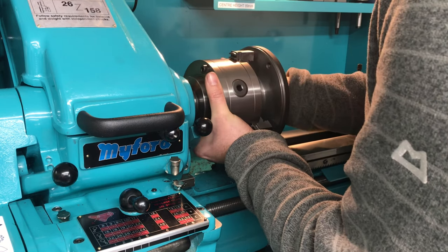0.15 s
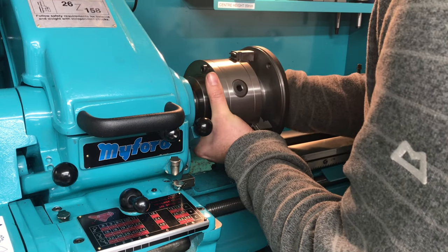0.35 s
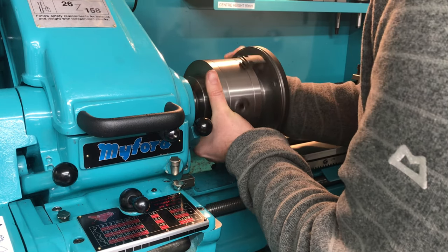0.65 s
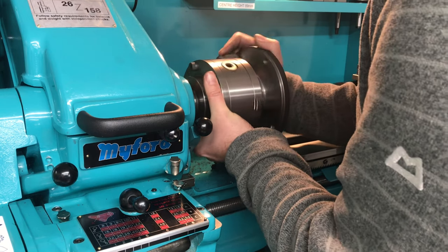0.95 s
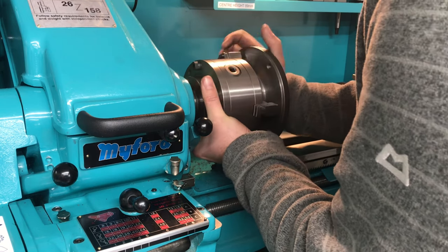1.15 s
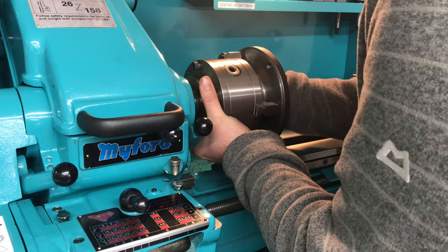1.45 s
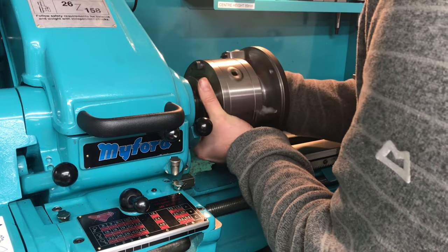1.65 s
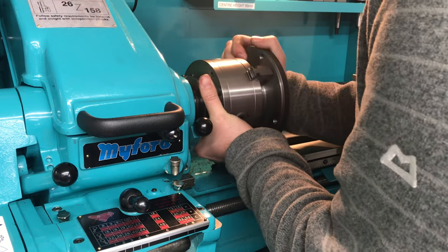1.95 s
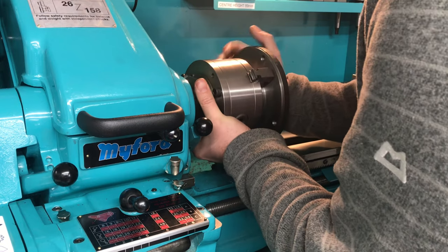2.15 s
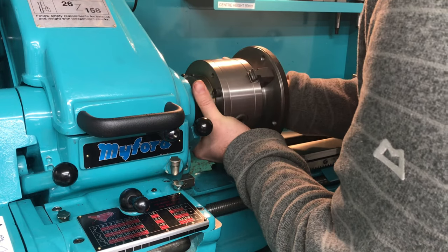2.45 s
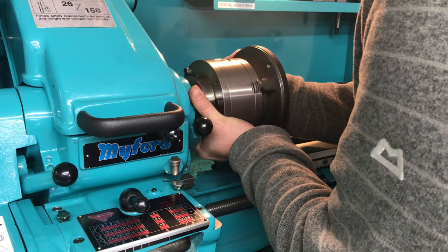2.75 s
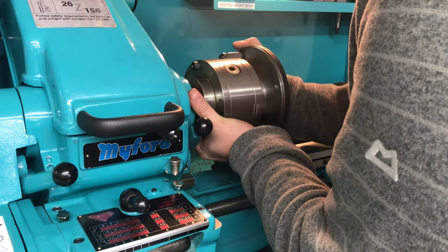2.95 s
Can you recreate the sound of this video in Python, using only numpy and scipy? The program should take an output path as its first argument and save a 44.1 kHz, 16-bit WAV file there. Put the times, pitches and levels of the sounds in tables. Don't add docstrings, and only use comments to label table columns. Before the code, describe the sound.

Close up in a small room, a metal chuck rubs on its thread, knocking the lathe casting and thumping its stand; the strongest clank comes two thirds through, then lighter knocks over faint hiss.

```python
import sys
import numpy as np
from scipy import signal
from scipy.fft import rfft, irfft
from scipy.io import wavfile
from scipy.ndimage import uniform_filter1d

SR = 44100
rng = np.random.default_rng(int(sys.argv[2]) if len(sys.argv) > 2 else 0)


def volts_from_decibels(level):
    exponent = np.asarray(level, float) / 20
    return 10 ** exponent


def digitize_waveform(pressure):
    field = np.atleast_2d(pressure).T
    bounded = np.clip(field, -1, 1)
    quanta = np.round(bounded * 32767).astype(np.int16)
    wavfile.write(sys.argv[1], SR, quanta)


N = 136710
SCATTER_DB = 3.5


def unit(x, size=None):
    return x / np.sqrt(np.mean(x[:size] ** 2))


def band(x, hz, width):
    low = np.sqrt(hz ** 2 + width ** 2 / 4) - width / 2
    high = min(low + width, 0.45 * SR)
    return signal.sosfilt(signal.butter(2, [low, high], "band", fs=SR, output="sos"), x)


def walk(rate):
    hold = int(SR / rate)
    steps = np.repeat(rng.standard_normal(N // hold + 1), hold)
    return 1.3 * uniform_filter1d(uniform_filter1d(steps, hold), hold)[:N]


def add(out, start_s, x):
    i = int(start_s * SR)
    out[i:i + len(x)] += x[:max(N - i, 0)]


def ring(modes, seconds):
    t = np.arange(int(seconds * SR))[:, None] / SR
    hz, db, t60 = np.array(modes).T
    return volts_from_decibels(db) * np.sin(2 * np.pi * hz * t) * np.exp(-np.log(1000) * t / t60)


def strike(sines, scatter_db):
    sign, strength = rng.standard_normal((2, sines.shape[1]))
    return sines @ (np.sign(sign) * volts_from_decibels(scatter_db * strength))


def blow(push, sines, db, scatter_db):
    return volts_from_decibels(db) * unit(signal.fftconvolve(push, strike(sines, scatter_db)), size=1800)


def dense(outline, count):
    outline_hz, outline_db, outline_t60 = np.array(outline).T
    place, damping = rng.random((2, count))
    hz = outline_hz[0] * (outline_hz[-1] / outline_hz[0]) ** ((np.arange(count) + place) / count)
    share = 0.25 ** damping
    db = np.interp(hz, outline_hz, outline_db) - 10 * np.log10(share)
    return list(zip(hz, db, share * np.interp(hz, outline_hz, outline_t60)))


# [f/Hz, level/dB, t60/s]
STAND_MODES = [(58, 2.5, 1), (66.5, -3, 0.6), (72, -3.5, 0.5), (77.9, 0.5, 0.4), (85, 0.5, 0.3),
               (95.9, 3.5, 0.53), (107.5, 4, 0.35), (117.3, 6, 0.36)]
# [f/Hz, level/dB, t60/s]
CABINET_MODES = [(140.7, -4, 0.37), (174.8, 0.5, 0.32), (185.6, -3, 0.755), (216.8, -2, 0.36),
                 (264, 7.5, 0.31), (292.8, -5.5, 0.77), (316.7, -9.5, 0.38), (380.3, -4, 0.4),
                 (414.6, -3, 0.63), (468.5, -18, 0.7)]
# [f/Hz, level/dB, t60/s]
PANEL_OUTLINE = [(130.85, -13.5, 0.35), (204, -3.5, 0.54), (304, 3.5, 0.55), (411, 1.5, 0.21),
                 (522.9, -4, 0.3)]
# [f/Hz, level/dB, t60/s]
CASTING_OUTLINE = [(454.9, -22, 1), (554, -3.5, 0.48), (774, 4, 0.33), (940, -1.5, 0.26), (1200, 5, 0.2),
                   (1700, -2.5, 0.087), (2300, -4, .1)]


def bodies():
    casting = dense(CASTING_OUTLINE, count=260)
    panels = [(hz, db - 2.5, t60) for hz, db, t60 in dense(PANEL_OUTLINE, count=40)]
    return STAND_MODES, casting, CABINET_MODES + panels, panels


# [f/Hz, level/dB per Hz]
HUSH_COLOUR = [(30, 11.5), (80, -2.5), (300, -8.5), (1200, -19.5), (3000, -24.5), (7500, -29),
               (10000, -29.5), (15600, -27)]


def hush():
    hz = np.fft.rfftfreq(N, 1 / SR) + 1
    colour_hz, colour_db = np.array(HUSH_COLOUR).T
    colour = volts_from_decibels(np.interp(np.log(hz), np.log(colour_hz), colour_db, left=-60))
    return volts_from_decibels(-62.5) * unit(irfft(rfft(rng.standard_normal(N)) * colour, N))


# [f/Hz, width/Hz, level/dB]
WHINE_BANDS = [(12480, 2100, -3.5), (13200, 1000, -4.5), (10600, 2200, -6)]


def circuit_hiss():
    frame_hz, first_frame_s = 30, 0.0313
    burst_s, busy_s = 0.0034, 0.0187
    frames = first_frame_s + np.arange(-1, N / SR * frame_hz) / frame_hz
    hiss, gate = np.zeros(N), np.zeros(N)
    for hz, width, db in WHINE_BANDS:
        hiss += volts_from_decibels(db) * unit(band(rng.standard_normal(N), hz, width)) * volts_from_decibels(2.1 * walk(60))
    delay, longer, size = rng.random((3, len(frames), 3))
    starts = frames[:, None] + np.array([0, busy_s, 1 / frame_hz]) * delay
    size = size * [1, 1, 0.7]
    for start_s, extra, strength in zip(starts.ravel(), longer.ravel(), size.ravel()):
        burst = np.abs(np.hanning(int((1 + extra) * burst_s * SR))) ** 0.5
        add(gate, max(start_s, 0), strength ** 0.29 * burst)
    return hiss * volts_from_decibels(-71) * (np.minimum(gate, 1) + 0.24)


# [t/s, level/dB]
TICK_TIMES = [
    (0.0323, -53),
    (0.6652, -52),
    (1.3094, -48),
    (1.5045, -62),
    (2.589, -49),
]


def circuit_ticks():
    out = np.zeros(N)
    for start_s, db in TICK_TIMES:
        pulse = np.eye(1, 200)[0]
        add(out, start_s, volts_from_decibels(db - 12) * unit(band(pulse, 8300, 4500), size=40))
    return out


# [t/s, level/dB]
TURNING_EFFORT = [(0.0, -61), (0.52, -58.5), (0.78, -50.5), (0.9, -53.5), (1.1, -62), (1.39, -59.5),
                  (1.56, -52.5), (1.92, -45), (2.05, -43.5), (2.24, -51), (2.43, -60), (2.68, -53),
                  (2.87, -51.5), (3.1, -50)]


def thread(stand, casting, panels):
    times, db = np.array(TURNING_EFFORT).T
    effort = volts_from_decibels(np.interp(np.arange(N) / SR, times, db))
    scrape = volts_from_decibels(-28 + 2 * walk(16)) * unit(band(rng.standard_normal(N), 4180, 9600))
    out = scrape * (effort / effort.max()) ** -0.28
    for modes, db in (stand, -6.5), (panels, -12.5), (casting, -18.5):
        rub = rng.standard_normal(N) * volts_from_decibels(4 * walk(24.64))
        held = [(hz, level, 0.5 * t60) for hz, level, t60 in modes]
        out += volts_from_decibels(db) * unit(signal.fftconvolve(rub, strike(ring(held, 0.32), 0))[:N])
    return out * effort


# [t/s, stand level/dB, cabinet level/dB, favoured f/Hz]
WEIGHT_SHIFTS = [(0.095, -55.5, -59.5, 59.6), (0.573, -54.5, -53, 76), (0.688, -43, -63, 87),
                 (0.759, -43, -53, 79.6), (0.886, -53, -59, 90), (0.99, -46.5, -55.5, 71),
                 (1.059, -47, -60.5, 79.3), (1.14, -49, -60.5, 63), (1.34, -51, -62.5, 69),
                 (1.494, -35, -53, 81), (1.544, -38.5, -69, 81), (1.592, -40, -76, 86),
                 (1.708, -42, -35, 78.4), (1.745, -39, -54, 62.7), (1.795, -37.5, -56, 91),
                 (1.9, -54, -54, 90), (1.969, -45, -53, 94), (2.035, -26.5, -31, 72),
                 (2.118, -28.5, -48, 83), (2.249, -40, -48.5, 63.8), (2.372, -41.5, -53, 63),
                 (2.449, -48, -53.5, 58), (2.572, -48, -57, 62), (2.68, -46.5, -50.5, 66),
                 (2.849, -45, -57, 63.7), (2.971, -49, -58, 70), (3.073, -47, -68, 75)]


def thumps(stand, cabinet):
    out, push = np.zeros(N), np.hanning(220)
    stand_hz = np.array(stand)[:, 0]
    stand_sines, cabinet_sines = ring(stand, 1.0), ring(cabinet, 0.73)
    for start_s, stand_db, cabinet_db, hz in WEIGHT_SHIFTS:
        favour = volts_from_decibels(-25 * np.abs(np.log2(stand_hz / hz)))
        add(out, start_s, blow(push, stand_sines * favour, stand_db - 8, 0))
        add(out, start_s, blow(push, cabinet_sines, cabinet_db - 8, SCATTER_DB))
    return out


# [t/s, casting level/dB, cabinet level/dB, chatter/s, brightness f/Hz]
THREAD_KNOCKS = [(0.167, -64, -78, .004, 1400), (0.178, -58, -77, 0.011, 1990),
                 (0.456, -59, -61, 0.01, 1500), (0.535, -55, -60, 0.0094, 1700),
                 (0.585, -57.5, -61.5, 0.008, 920), (0.657, -62, -48, 0.019, 700),
                 (0.672, -44.5, -49.5, 0.0057, 1800), (0.681, -44.5, -44, 0.0046, 820),
                 (0.686, -39.5, -42.5, 0.002, 870), (0.696, -41, -44, 0.011, 1700),
                 (0.767, -54, -55, 0.0072, 900), (0.826, -51, -54, 0.012, 690),
                 (0.864, -49, -77, 0.01, 1590), (0.885, -49, -54.5, 0.0019, 800),
                 (0.926, -61, -59, 0.012, 810), (1.018, -61, -56.5, .008, 700),
                 (1.483, -60, -54.5, 0.0041, 1200), (1.633, -59, -58.5, 0.0068, 900),
                 (1.687, -51, -42, 0.0066, 1200), (1.707, -47, -44, 0.02, 600),
                 (1.735, -46, -45, 0.0086, 1610), (1.868, -44.5, -51, 0.0067, 1420),
                 (1.875, -66, -44.5, 0.0079, 700), (1.904, -59, -44, 0.008, 800),
                 (1.957, -52, -48.5, .006, 700), (1.969, -53, -46, 0.0059, 1490),
                 (2.013, -28.5, -38, 0.0056, 1470), (2.029, -29, -30.5, 0.0043, 1080),
                 (2.151, -54, -54.5, 0.0054, 1020), (2.676, -54, -53.5, 0.004, 1290),
                 (2.753, -56, -50.5, 0.0024, 800), (2.842, -43, -48.5, 0.0082, 1260),
                 (2.858, -42, -42.5, 0.0041, 810), (2.925, -60, -53, 0.015, 700),
                 (2.944, -49.5, -59, 0.012, 880), (3.02, -56.5, -54.5, 0.0083, 900),
                 (3.045, -59, -56, 0.0053, 1400)]


def knocks(casting, cabinet):
    out = np.zeros(N)
    casting_sines, cabinet_sines = ring(casting, 0.57), ring(cabinet, 0.73)
    for start_s, casting_db, cabinet_db, chatter_s, top_hz in THREAD_KNOCKS:
        fade = np.exp(-np.arange(2600) / SR / chatter_s)
        grit = rng.standard_normal(len(fade)) ** 3 * fade
        grit[0] += 44
        soft = signal.lfilter(*signal.butter(3, top_hz, fs=SR), grit)
        add(out, start_s, blow(soft, casting_sines, casting_db - 12.5, SCATTER_DB))
        pressure = uniform_filter1d(np.abs(grit), size=30)
        add(out, start_s, blow(pressure, cabinet_sines, cabinet_db - 4, SCATTER_DB))
    return out


# [t/s, level/dB, f/Hz, t60/s]
CLICKS_AND_SCUFFS = [(0.179, -63.5, 1700, 0.079), (0.179, -74, 5087, 0.068), (0.4574, -74, 2010, 0.035),
                     (0.5374, -64.5, 1560, .07), (0.8634, -49, 1880, 0.075), (0.8645, -68, 3280, .05),
                     (0.864, -74.5, 8600, .04), (0.881, -63, 2100, .18), (0.935, -75, 8140, .04),
                     (1.093, -69.5, 4000, 0.053), (1.576, -71, 2700, 0.065), (1.599, -74, 2220, 0.24),
                     (1.649, -71.5, 4900, 0.18), (1.6846, -69.5, 2080, 0.064), (1.733, -55, 2040, 0.17),
                     (1.7324, -75, 8600, .04), (1.852, -72, 4800, 0.11), (1.951, -82, 8450, 0.025),
                     (1.973, -71.5, 2370, .04), (2.0133, -41, 1390, 0.12), (2.016, -72, 5960, .08),
                     (2.016, -63, 2930, .08), (2.7377, -55, 2020, 0.055), (2.738, -71, 2780, 0.038),
                     (2.940, -78, 2270, 0.31), (2.999, -76.5, 4195, 0.19)]


def clicks():
    out, t = np.zeros(N), np.arange(9000) / SR
    for start_s, db, hz, t60 in CLICKS_AND_SCUFFS:
        spray = rng.standard_normal(len(t)) * 1000.0 ** (-t / t60)
        if t60 < 0.075:
            spray[0] += 8
        if t60 >= 0.19:
            spray *= np.minimum(t / (0.004 + 0.1 * t60), 1)
        width = 0.95 * min(hz, 2500)
        add(out, start_s, volts_from_decibels(db) * unit(band(band(spray, hz, width), hz, width), size=600))
    return out


# [t/s, level/dB, f/Hz, t60/s]
LONE_RINGS = [(0.537, -66, 2860, .15), (0.538, -62, 719, 0.15), (0.864, -62, 3306, .22),
              (0.885, -50, 746, 0.11), (1.581, -65, 1440, 0.11), (1.589, -66, 2700, .15),
              (1.657, -61.5, 1470, 0.36), (1.733, -45, 2680, 0.063), (1.7332, -48.5, 3214, 0.086),
              (1.734, -59, 2929, 0.098), (1.735, -52, 2390, 0.087), (1.742, -49, 2700, 0.17),
              (1.760, -60, 2534, 0.18), (1.867, -52, 1470, 0.15), (1.870, -51, 764, 0.14),
              (1.888, -41.5, 750, 0.095), (1.920, -53, 766, .08), (1.966, -59, 1465, 0.091),
              (2.014, -39, 883, 0.22), (2.030, -39.5, 939.5, 0.28), (2.031, -43.5, 1035, 0.37),
              (2.032, -49, 659.6, 0.26), (2.745, -54, 2560, .06), (2.758, -56, 2360, 0.066),
              (2.970, -64, 2150, 0.052), (2.990, -69, 2560, .09), (3.035, -61, 1500, 0.052),
              (3.074, -52.5, 990, 0.03)]


def lone_rings():
    out = np.zeros(N)
    fade_in = np.clip(np.arange(11025) / 120, 0, 1)
    for start_s, db, hz, t60 in LONE_RINGS:
        modes = [(hz, 0, t60), (hz + 43, -8, t60), (hz - 67, -10, t60)]
        add(out, start_s, volts_from_decibels(db) * strike(ring(modes, 0.25), 0.6) * fade_in)
    return out


def room(x):
    t = np.arange(SR // 2) / SR
    tail = np.zeros(len(t))
    for hz in 125 * 2.0 ** np.arange(7):
        t60 = np.interp(np.log2(hz / 125), [1, 5], [0.51, 0.22])
        octave = band(rng.standard_normal(len(t)), hz, 0.64 * hz)
        tail += octave * 1000.0 ** (-t / t60) * np.clip(t / 0.0056, 0, 1)
    return volts_from_decibels(-14) * signal.fftconvolve(x, tail / np.sqrt(np.sum(tail ** 2)))[:N]


def scene():
    stand, casting, cabinet, panels = bodies()
    machine = thread(stand, casting, panels) + thumps(stand, cabinet) + knocks(casting, cabinet)
    machine += clicks() + lone_rings()
    return (machine + room(machine) + hush() + circuit_hiss() + circuit_ticks())[None]


def top_cut(x):
    return signal.sosfilt(signal.butter(12, 15660, fs=SR, output="sos"), x)


MIC_DIPS = (4900, 7650, 10500)


def record(dry):
    mix = signal.sosfilt(signal.butter(3, 50, "high", fs=SR, output="sos"), dry)
    for hz in MIC_DIPS:
        mix = mix - 0.25 * band(mix, hz, 1000)
    mix = signal.sosfilt(signal.ellip(10, 0.2, 60, 15720, fs=SR, output="sos"), mix)
    return top_cut(mix)


dry = scene()
out = record(dry)
digitize_waveform(out)
```